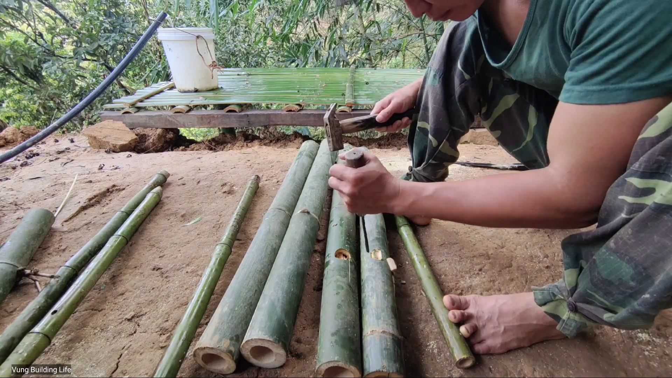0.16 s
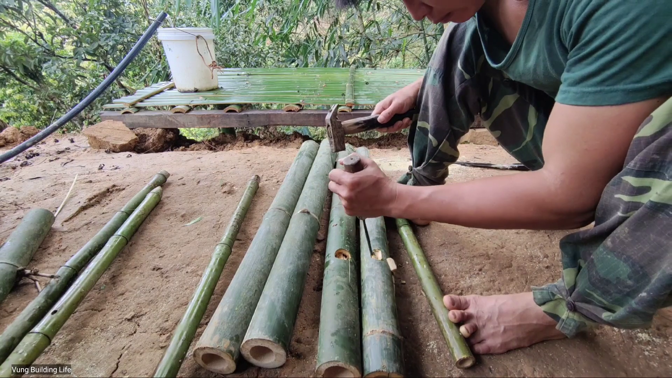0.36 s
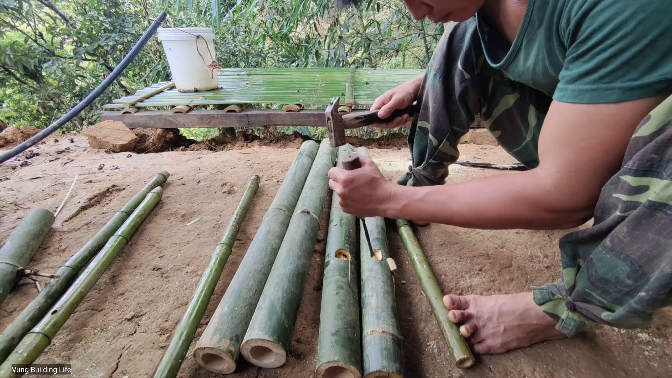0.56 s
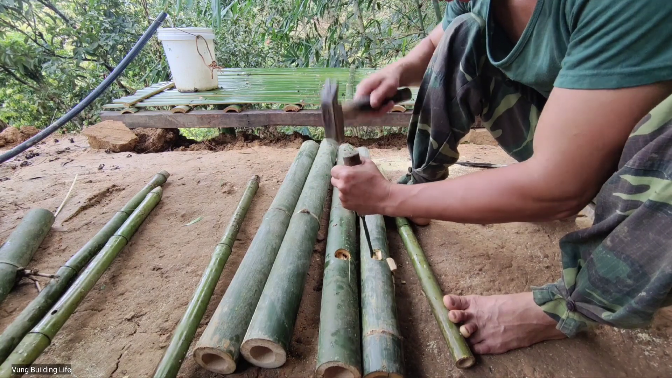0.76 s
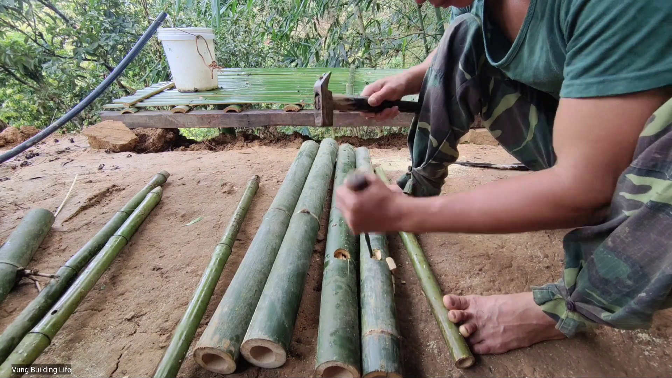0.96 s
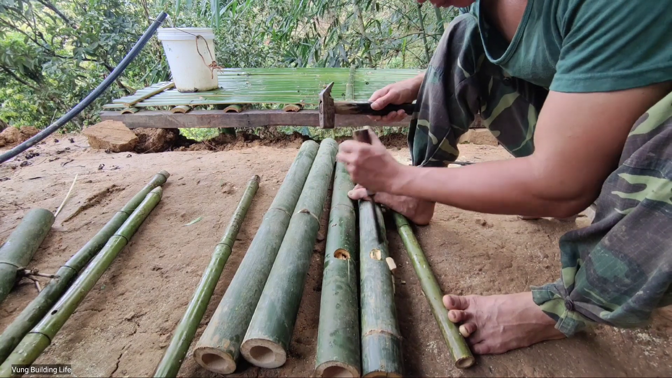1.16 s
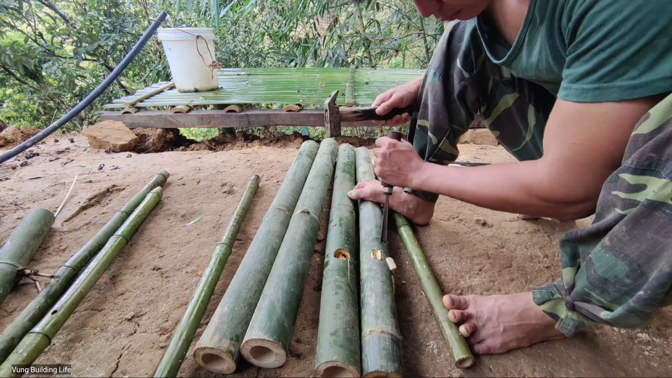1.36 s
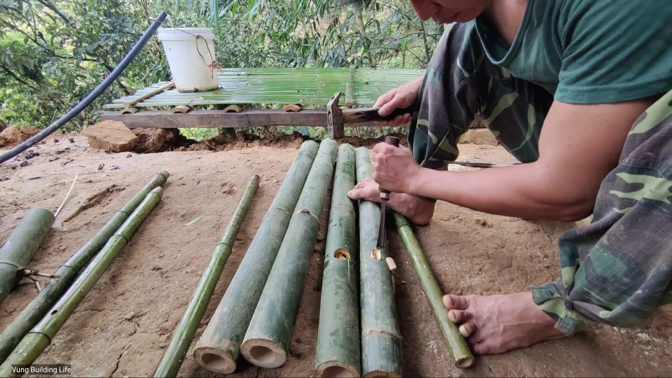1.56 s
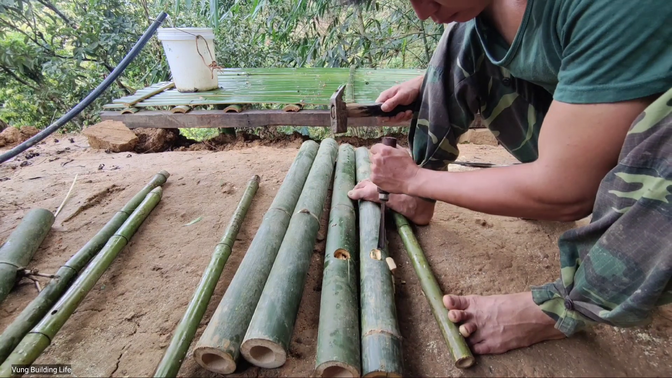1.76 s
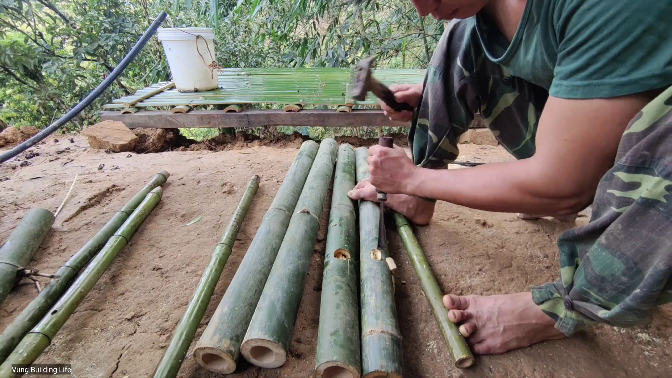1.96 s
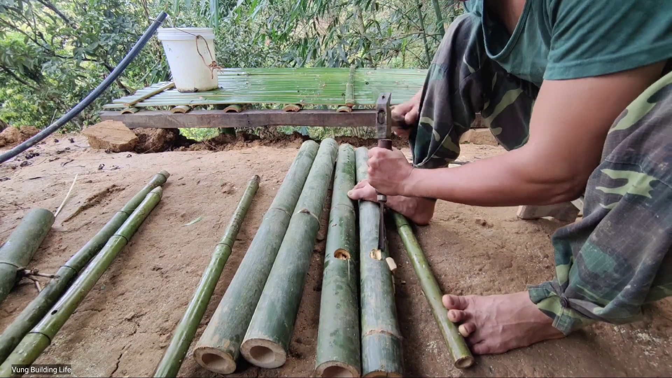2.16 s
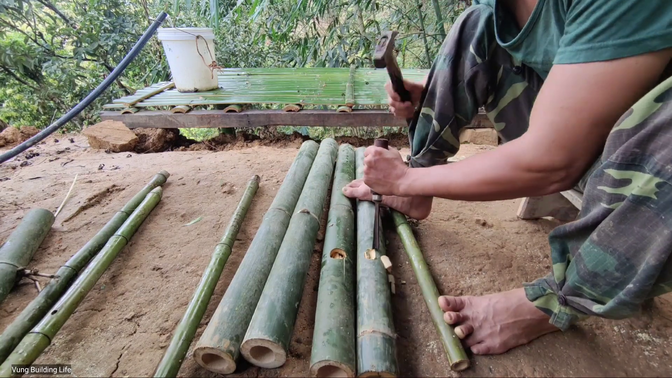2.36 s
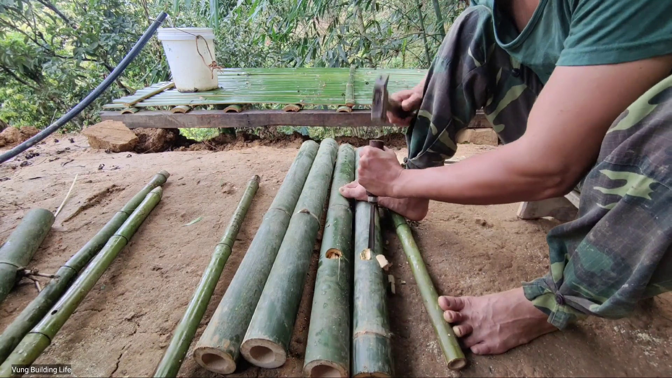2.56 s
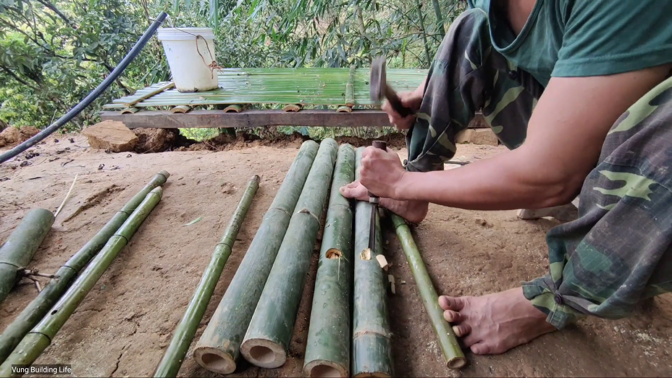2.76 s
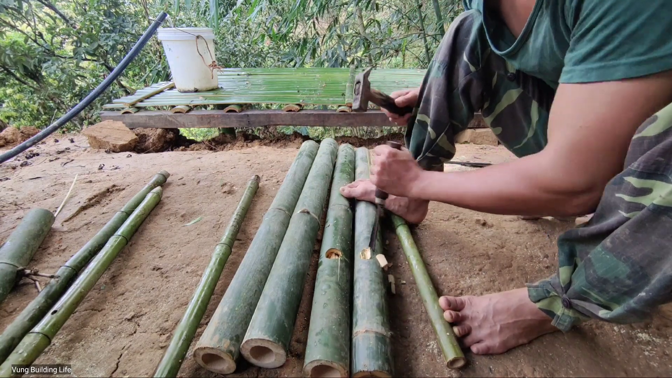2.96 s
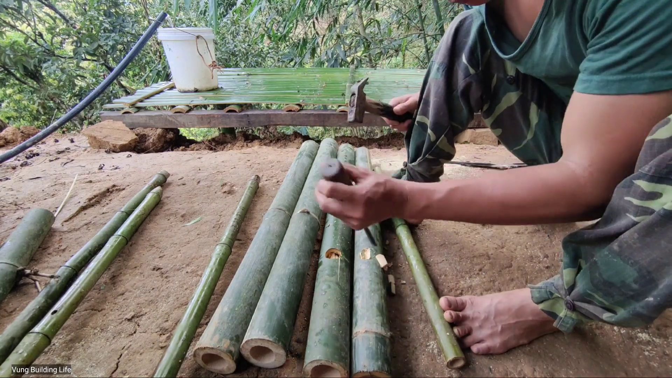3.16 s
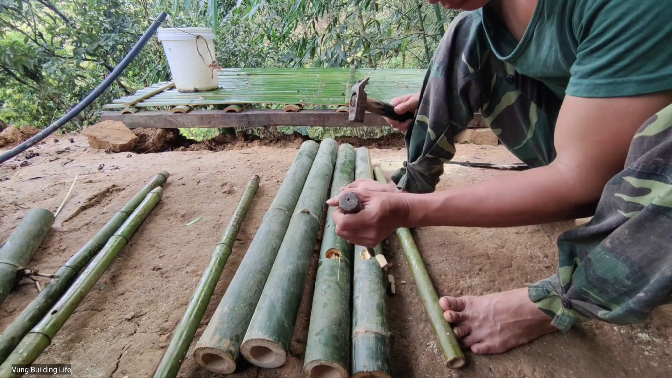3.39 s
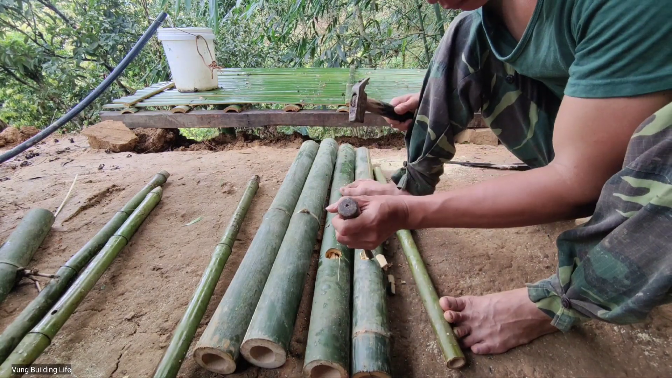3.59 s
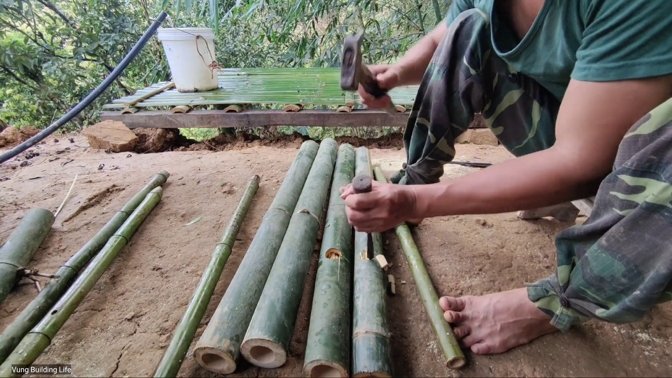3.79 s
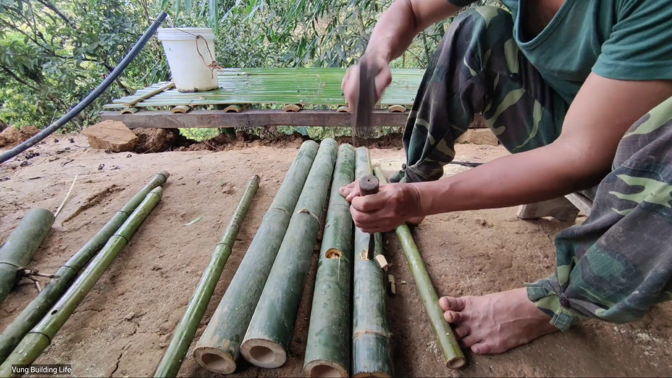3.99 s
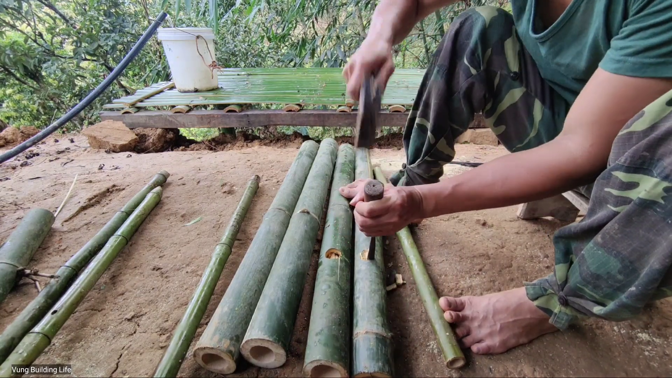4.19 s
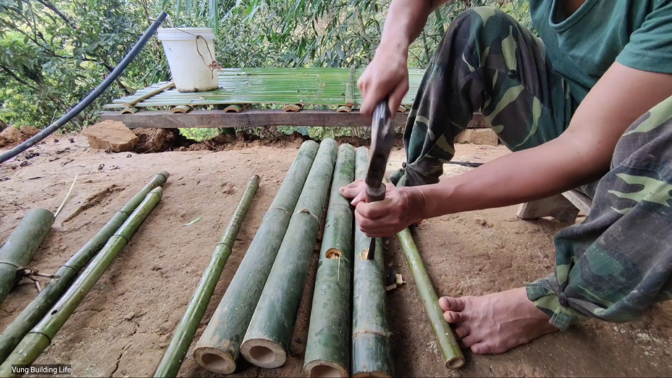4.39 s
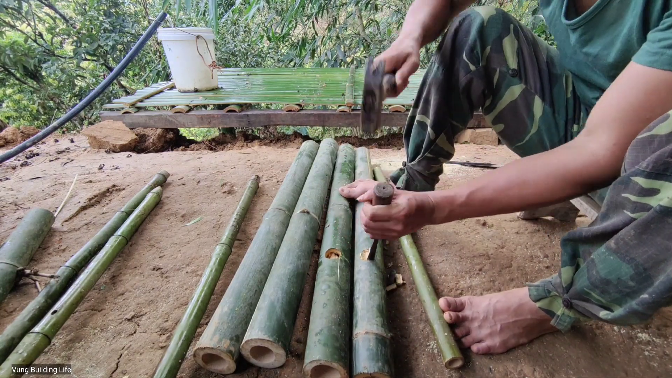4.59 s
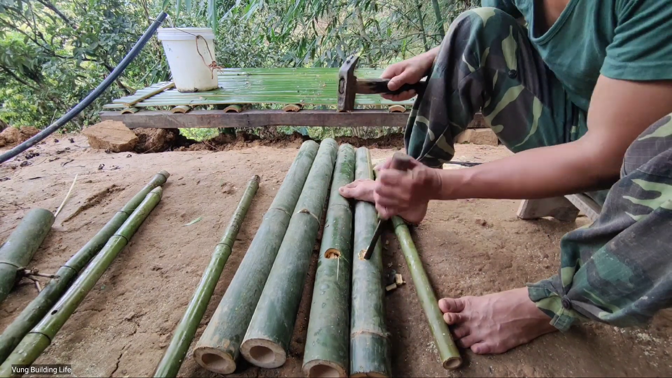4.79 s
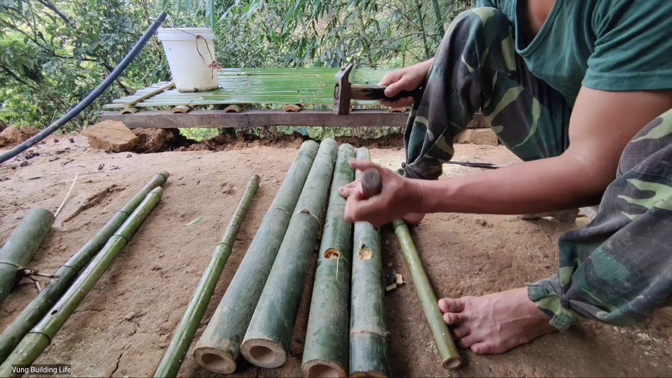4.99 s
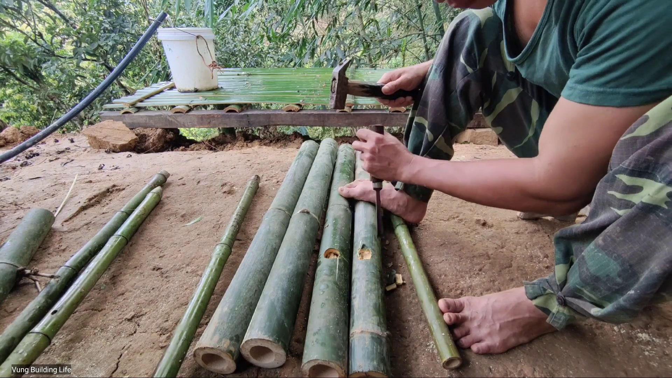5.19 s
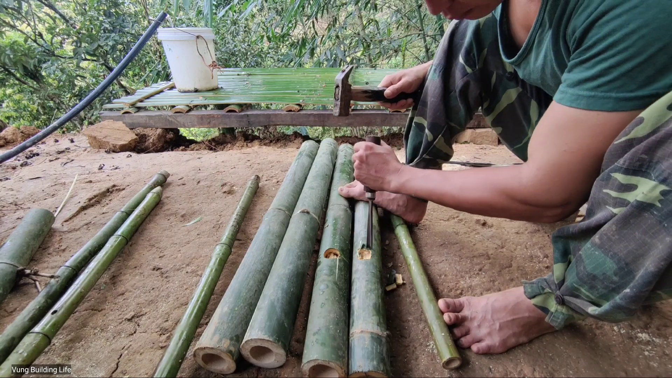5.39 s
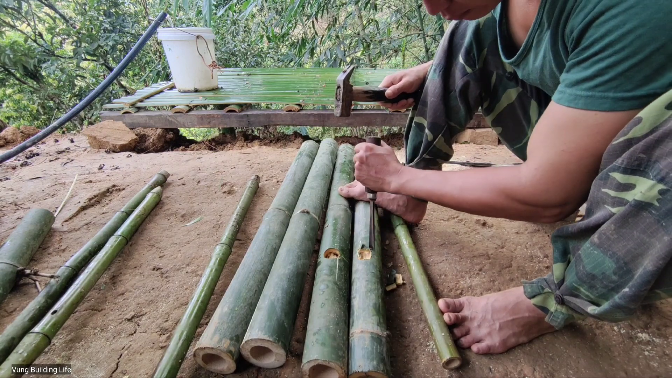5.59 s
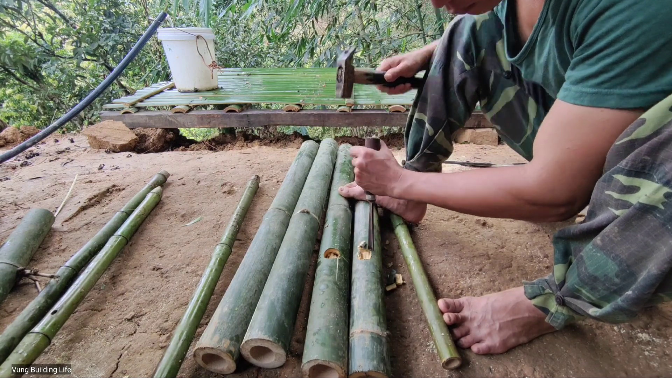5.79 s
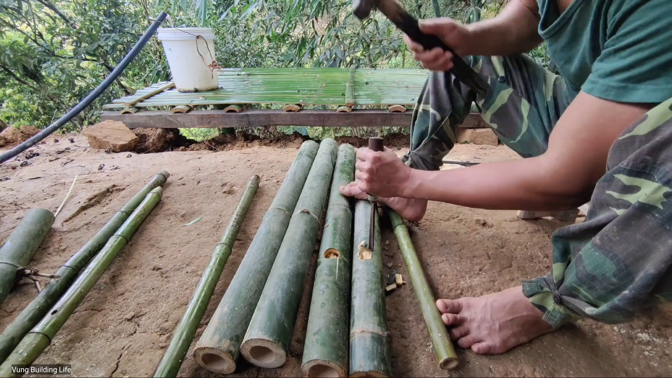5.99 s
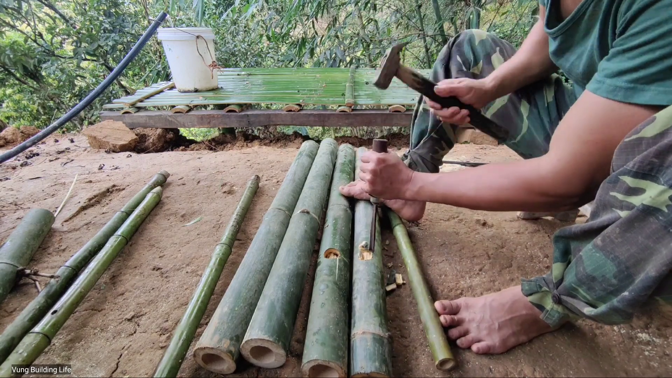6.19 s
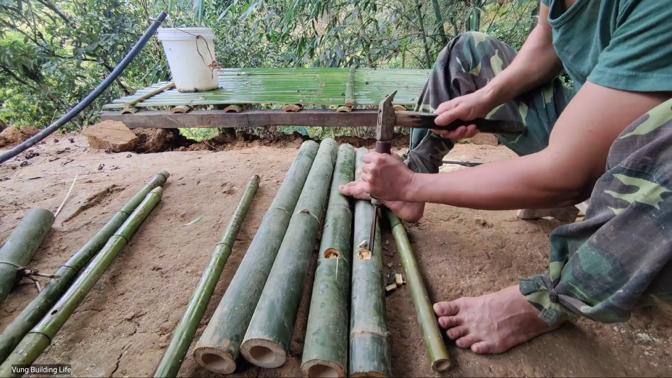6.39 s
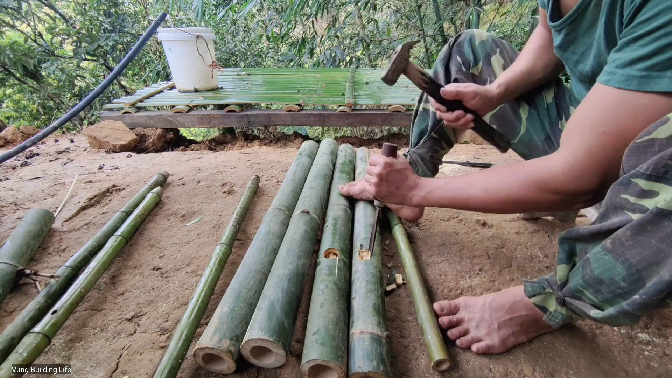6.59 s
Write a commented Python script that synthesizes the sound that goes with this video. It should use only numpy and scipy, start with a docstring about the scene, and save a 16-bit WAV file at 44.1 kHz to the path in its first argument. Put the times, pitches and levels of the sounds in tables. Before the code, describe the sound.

Outdoors, a phone microphone sits a metre or two from the work. A thin, very high cicada hiss, stronger on the right, throbs about eleven times a second throughout over a faint low breeze and leaf rustle. Tiny bird whistles come before 0.9 s. A light chisel rub at 0.6 precedes two bright steel cracks at 0.8 and 0.9; another rub follows at 1.3. From 2.07 to 2.84 seven quick, even blows ring the hollow bamboo briefly, each with a short grainy tail. Small snaps and scraping occur around 3.05, then faint birds near 3.4. Six blows run from 3.94 to 4.59, growing stronger. A crisp chip snap and gritty rub stand out at 4.9. A distant, dull engine fades in after 5.2, with soft rubs around 5.4 to 5.9. Four hard blows from 6.18 to 6.56 end it. The background ducks around the blows.

```python
"""Chiselling green bamboo outdoors

A hammer drives a steel chisel into bamboo poles in quick bursts, a metre or two from a phone's microphone.
Each blow is a resonant steel crack, a ring of the hollow pole and a grainy scatter off trees and ground.
Rubs and snaps are short noise bands; cicadas on the right are throbbing, buzzing noise; birds are faint sines.
Breeze and leaves are coloured noise; a far engine starts up as firing pulses through a dull exhaust.
The phone's bang suppressor ducks everything around each blow, band by band, and then mostly lets go at once.
"""
import sys
import numpy as np
from scipy import signal
from scipy.fft import rfft, irfft
from scipy.io import wavfile
from scipy.ndimage import uniform_filter1d, minimum_filter1d

SR = 44100
rng = np.random.default_rng(int(sys.argv[2]) if len(sys.argv) > 2 else 0)


def file_out(sig):
    """Save sig as 16-bit WAV at sys.argv[1]."""
    # one column per channel
    cols = np.atleast_2d(sig).T
    # limit, then scale
    lim = np.clip(cols, -1, 1)
    pcm = np.round(lim * 32767).astype(np.int16)
    wavfile.write(sys.argv[1], SR, pcm)


N = 293265  # length [samples]

# far engine: (time [s], firing rate [Hz], level [dB])
ENGINE_COURSE = [(4.9, 59.5, -110), (5.2, 59.7, -82), (5.5, 61.2, -73), (5.7, 62.24, -61.5),
                 (5.9, 60.5, -63), (6.15, 61.43, -65), (6.65, 60.8, -59)]
# exhaust resonances, before the response is squared: (centre [Hz], width [Hz], level [dB])
EXHAUST_MODES = [(436, 112, 40), (260, 36, -23), (563, 91, -33.5)]
# colour of breeze and leaves, shape only: (frequency [Hz], level [dB per Hz])
FOREST_COLOUR = [(15, -69), (25, -30), (150, -12.5), (183, -8.5), (272, -6), (308, 5.5), (481, -2.5),
                 (580, -2), (690, -1), (740, -8.5), (2810, -14.5), (3430, -15.5), (3690, -15), (8600, -13),
                 (9500, -8.5), (12400, -32), (20900, -120)]
# breeze, before each band's own offset: (time [s], level [dB])
BREEZE_LEVEL = [(0, -71.5), (.65, -72.5), (1.4, -74.5), (1.93, -73.5), (2.39, -70.5), (3.13, -69.5),
                (3.65, -74.5), (4.41, -69), (5.08, -71), (5.74, -70.5), (6.2, -67), (6.65, -66)]
# the whole cicada song, before panning: (time [s], level [dB])
CICADA_LEVEL = [(0, -51), (.6, -49), (1.2, -50), (2, -50), (2.8, -50), (3.3, -51), (3.7, -49.5),
                (4.3, -49.5), (4.9, -49), (5.9, -49), (6.65, -48)]
# colours of the song's upper, lower and edge bands, shape only: (frequency [Hz], level [dB per Hz])
HIGH_COLOUR = [(10800, -30), (11500, -6), (12300, 0), (12950, -2.5), (13250, -7), (13700, -26),
               (14400, -29.5), (15420, -16), (15600, -66)]
LOW_COLOUR = [(10200, -46), (10500, -7), (11000, -4.5), (11600, -5.5), (12200, -11)]
EDGE_COLOUR = [(9000, -16), (9350, -13.5), (9700, 1.5), (10300, 3.5), (10700, 9.5), (11000, -35)]
# dips of the song's lower edge: throbs about eleven times a second and, just after some blows,
# the suppressor's deeper duck; depths are scaled later, positive ones ignored:
# (time [s], depth [relative dB], depth at the very edge [relative dB])
SONG_DIPS = [(0.092, -9.0, -19), (0.176, -12, -19), (0.249, -7, -8), (0.335, -3, -2), (0.445, 0, -3),
             (0.545, -5, -7), (0.635, -7.0, -8), (0.726, -10.0, -16), (0.81, -14.5, -10),
             (0.936, -11.0, -8.0), (1.02, -4.5, -1), (1.095, -3.0, -3), (1.195, -2, -6), (1.277, -6, -13.0),
             (1.367, -4, -10.0), (1.443, -3.0, -5), (1.574, -4, -10), (1.666, -4, -6), (1.75, -4, -2),
             (1.862, -6.0, -13.0), (1.98, -5, -11.0), (2.161, -9, -15), (2.281, -16, -8), (2.361, -13, -14),
             (2.49, -13, -10), (2.558, -9, -19), (2.672, -9, -6), (2.78, -4, -6), (2.933, -12, -10.0),
             (3.019, -15, -14.0), (3.115, -13, -9), (3.221, -12, -20), (3.334, 0, -2), (3.42, -5, -11),
             (3.506, -4.0, -8), (3.64, -2, -12.0), (3.734, -5, -4), (3.813, -3.5, -9), (3.93, -3, -6.0),
             (4.037, -6, -8), (4.145, -4.0, 2), (4.274, -11.0, -9), (4.406, -11.0, -9), (4.545, -3, -5),
             (4.623, -16, -10.0), (4.66, -8, -8.0), (4.755, -7.0, -14.0), (4.849, -8, -12.0),
             (4.959, -1, -3), (5.045, -5, -7), (5.132, -5, -3), (5.212, -3, -7), (5.342, -1, -8),
             (5.438, -3, -12.0), (5.517, -2, -10.0), (5.661, -3, -7), (5.751, -6, -12.0),
             (5.831, -7.0, -12.0), (5.933, -4, -7.0), (6.074, -5.0, -9.0), (6.154, -4, -8.0),
             (6.246, -6.0, -10.0), (6.334, -9.0, -8.0), (6.461, -9, -5), (6.589, -8, -2)]
# faint bird whistles: (middle [s], half length [s], pitch [Hz], rise [Hz], level [dB])
BIRD_NOTES = [(.138, .018, 2830, -80, -77), (.663, .019, 2480, 50, -63), (.760, .012, 2470, 0, -68),
              (.825, .022, 2460, 30, -61), (.872, .018, 2480, 60, -62), (3.31, .03, 3470, 0, -80),
              (3.395, .025, 3470, 0, -77), (3.485, .03, 3450, -30, -75)]
# chisel rubbing the pole; width before squaring:
# (time [s], level [dB], centre [Hz], width [Hz], 60 dB decay [s])
CHISEL_RUBS = [(0.609, -62.5, 4900, 2500, 0.38), (1.331, -60.5, 7000, 2500, 0.13),
               (3.034, -56, 7500, 6000, 0.14), (3.038, -65, 2720, 900, 0.25), (3.072, -57, 4800, 3000, 0.1),
               (4.754, -64, 3760, 2500, 0.41), (4.886, -48.5, 8400, 4020, 0.24),
               (4.9, -54, 4730, 4000, 0.2), (5.368, -67, 3220, 3030, 0.32), (5.75, -69.5, 2500, 2520, 0.46),
               (5.763, -62.5, 7100, 1950, 0.5), (5.899, -69.5, 3540, 4100, 0.84)]
# a chip tears and snaps off; width before squaring:
# (time [s], level [dB], centre [Hz], width [Hz], 60 dB decay [s], 60 dB growth before the time [s])
CHIP_SNAPS = [(1.0516, -50, 14500, 2000, .03, .002), (2.8904, -50, 14500, 2000, .012, .002),
              (3.0388, -41, 14700, 1800, .006, .001), (3.0355, -56, 8500, 3000, .01, .001),
              (3.0705, -44, 4900, 1500, .025, .04), (3.069, -51, 2700, 700, .015, .04),
              (4.8993, -26.5, 11500, 7000, .009, .0003), (4.8993, -30, 5700, 2000, .009, .0003),
              (4.8995, -39, 4200, 900, .05, .0005), (6.0902, -56, 14500, 2000, .015, .002)]
# hammer blows, before the suppressor: (time [s], crack peak [dB], knock below 2.3 kHz [dB],
#  mode near 2.8 kHz [dB], top above 10 kHz [dB], more above 13 kHz [dB],
#  chisel's loudest ring [Hz], [dB], its next ring [Hz], [dB],
#  pole ring [dB], its lower modes [dB], tail [dB], tail below 3 kHz [dB],
#  band lingering in the tail [Hz], [dB], left minus right of crack and tail [dB])
HAMMER_BLOWS = [(0.7788, -9.5, -2.5, 3, 9, 2, 3700, 12.5, 5560, 6.5, -47, -1, -1.5, 2, 5500, 1, 1.5),
                (0.9027, -6, -2.5, -7, 4, 1, 5380, 9.5, 8500, 2, -41, 8.5, -1, 4.5, 8200, 6, 0.5),
                (2.0675, -9.5, -2, -15, -1, 2, 2400, 2.5, 4100, -3, -50, -5, -6, 4.5, 3600, 7, 3.5),
                (2.2031, -7.5, 2, -3, -0.5, 11, 3820, 8.5, 7300, 3.5, -27.5, 0, -3.5, -0.5, 7300, 9, 3.5),
                (2.3323, -4.5, 5.5, -2.5, -2.5, -4, 7400, 4, 12500, 7, -22.5, -4.5, 2, -2.5, 3330, 0, 1),
                (2.46, -4.5, 1, -5, 4.5, 6, 7240, 5, 12500, 10, -23, -6.5, -3, -4, 7460, 3, 2),
                (2.5857, -2.5, -3, -5.5, 5.5, 4, 6450, 6, 12800, 11, -26.5, -1.5, -1, -4, 5600, -3, 1.5),
                (2.709, -6.5, 4, 1, -4.5, -7, 4650, 6, 7730, 5, -24, 0.5, 0, -2.5, 5170, 2, 2.5),
                (2.8404, -4.5, 2.5, -2, 2.5, 4, 3700, 5.5, 11500, 3, -23.5, 1.5, -2, 0.5, 5800, 2, 2),
                (3.9395, -11.5, -5.5, -1, -4, 0, 3260, 3.5, 11930, 7, -23.5, -10, -3.5, 3.5, 3300, -8, 1.5),
                (4.072, -9, -2, -9, 4, -2, 5880, 15, 7900, 14.5, -48, 14, -3.5, 2.5, 6300, 10, 2),
                (4.205, -4.5, -3, -15, -3, -11, 8050, 10.5, 5800, 8, -24.5, 3.5, -2, 1, 7700, -5, 0),
                (4.3357, -4, -4, 0.5, 2.5, 2, 5690, 8, 6700, 5, -20.5, 1, -2, 0, 6060, 8, 4),
                (4.4650, -2.5, -9, -0.5, 5, -4, 4570, 6, 8960, 4, -20, -3, -0.5, -2, 4670, -7, -1),
                (4.5938, -5, -10, 7, 0.5, 5, 4620, 13.5, 6530, 1.5, -16.5, -3, -1.5, -0.5, 2550, 5, 1.5),
                (6.1774, -8, 3, 4, 1, -1, 4340, 5.5, 10660, 5.5, -57, 5, -1, -5, 7560, 9, -3),
                (6.307, -4, -9, 0, 3.5, -6, 3980, 5.5, 7440, 4, -47, -8, 0, -9.5, 2707, 1, 1.5),
                (6.4339, -2, 0.5, -1, 8, 0, 6100, 10, 11200, 6, -34, 0, 1, -10, 5600, 7, 1.5),
                (6.562, -5.5, -0.5, -2, 2.5, -0.5, 7460, 6.5, 5380, 6, -29.5, -5, -1, -8, 5430, 6, 0.5)]
# crack resonances, varied at each blow: (centre [Hz], width [Hz], level [dB])
CRACK_MODES = [(1030, 500, -21.5), (1960, 644, 1), (2760, 216, 6), (3760, 780, -4.5), (4595, 590, -0.5),
               (5270, 420, -3.5), (5980, 680, 0.5), (7530, 480, 1), (8800, 920, -5), (10410, 770, -0.5),
               (11470, 630, 2.5), (12380, 740, 4), (13250, 500, -4), (15300, 490, -6)]
# hollow pole's modes, varied at each blow: (pitch [Hz], level [dB], 60 dB decay [s], build-up [s])
POLE_MODES = [(239, -21, 0.092, 0.023), (364.4, -21.5, .18, 0.036), (537, -12, 0.22, 0.083),
              (600, -9.5, 0.21, 0.064), (669, -0.8, 0.16, 0.041), (719, -15, 0.12, 0.027),
              (895, -21, 0.078, .02)]
# scattered tail over the crack's own colour: (frequency [Hz], gain [dB])
SCATTER_COLOUR = [(500, -5), (900, 7), (1500, 4), (3000, 6), (5000, 5.5), (8000, 6.5), (10000, 5.5),
                  (13000, -3.5), (15500, 8), (16500, -60)]
# suppressor bands: (upper edge [Hz], share of the duck, part that sets in late, part that recovers slowly)
SUPPRESSOR_BANDS = [(905, 1.02, 0.84, 0.01), (8900, 0.87, 0.79, 0.066), (12000, 1.2, 0.88, 0.56),
                    (20200, 1.15, 0.76, 0.32)]

DIP_S, EDGE_DIP_S = 0.019, 0.019  # half length of a dip in the song, and at its edge
EDGE_WAVER_DB = 1.5
RUB_RISE_S, RUB_PAN_DB = 0.0021, -1
CLICK, RING_WIDTH_HZ = 3.27, 335  # first contact against the splintering after it; chisel rings' width
LOOSE_DB, LOOSE_HZ = -9, 45  # noisy part of the pole's 669 Hz mode; its width before squaring
THUMP_HZ, THUMP_DB, THUMP_T60_S = 444, 2, 0.0092  # the pole's wall gives first; dB over the ring
SCATTER_DB, SMEAR = -23, 2.6  # the many paths widen each resonance this many times
PATCHY_DB, FINE_DB = 3, 2  # spread of the tail's colour from band to band, and from line to line
THRESHOLD_DB = -18.5
AHEAD_S, RAMP_S, HOLD_S = .003, .003, .039
LATE_S, SLOW_S = 0.009, .04  # time constants of late onset and slow recovery
# a lone bang is ducked lightly, one in a run harder; bites are dB of duck per dB over the threshold
BITE, WARM_BITE, FULL_BITE, MEMORY_S = 0.024, 9.7, 1.345, 0.54  # first, added, most, memory
RUMBLE_HZ, TOP_HZ = 76.4, 16600  # the phone's bass cut and upper limit


def undb(db):
    """Decibels to amplitude."""
    return 10 ** (np.asarray(db) / 20)


def level(x, db):
    """Scale to an rms level in dB."""
    return x * undb(db) / np.sqrt(np.mean(x ** 2))


def pan(db):
    """Channel gains for left minus right in dB."""
    return undb(np.array([[db], [-db]]) / 2)


def curve(table, column=1):
    """A table column drawn as straight lines over time."""
    return np.interp(np.arange(N) / SR, np.array(table)[:, 0], np.array(table)[:, column])


def hertz(size):
    """Frequencies of the spectrum's lines, kept above zero."""
    return np.maximum(np.fft.rfftfreq(size, 1 / SR), 1)


def gains(points, size):
    """Gain at each frequency for (Hz, dB) points, silent outside."""
    hz, db = np.transpose(points)
    return undb(np.interp(np.log(hertz(size)), np.log(hz), db, -200, -200))


def peaks(rows, size):
    """Summed response of (Hz, width, dB) resonances."""
    f = hertz(size)
    return sum(undb(db) / (1 + 1j * (f - hz * hz / f) / width) for hz, width, db in rows)


def noise(gain, alike, size):
    """Two channels of coloured noise of rms 1; alike = 1 makes them equal."""
    mid, side = rfft(rng.standard_normal((2, size)))
    alike = np.clip(alike, 0, 1)
    both = np.sqrt(1 + alike) * mid + np.sqrt(1 - alike) * side * np.array([[1], [-1]])
    return level(irfft(both * gain, size), 0)


def steps(size, length):
    """Random values, each held for a number of samples."""
    return np.repeat(rng.standard_normal(size // length), length)


def walk(rate):
    """Random levels held 1 / rate s and slewed twice; spread near 1."""
    k = int(SR / rate)
    held = np.repeat(rng.standard_normal(N // k + 1), k)
    return 1.45 * uniform_filter1d(uniform_filter1d(held, k), k)[:N]


def add(out, sound, s):
    """Mix a sound in at s seconds."""
    i = int(s * SR)
    out[:, i:i + sound.shape[1]] += sound[:, :N - i]


def fade(t, rise, t60):
    """Exponential build-up, then a decay of 60 dB in t60 s."""
    return (1 - np.exp(-t / rise)) * undb(-60 * t / t60)


def lag(x, s):
    """Follow a signal with a time constant of s seconds."""
    keep = np.exp(-1 / (s * SR))
    return signal.lfilter([1 - keep], [1, -keep], x)


def engine():
    """Uneven firings ring a dull exhaust far away; the air makes it waver."""
    rate = curve(ENGINE_COURSE) * (1 + 0.009 * walk(30))
    turns = np.floor(np.cumsum(rate) / SR).astype(int)
    strength = undb(2.0 * rng.standard_normal(N // 100))
    pulses = np.diff(turns, prepend=0) * strength[turns]
    exhaust = irfft(rfft(pulses) * peaks(EXHAUST_MODES, N) ** 2, N)
    return level(exhaust, 0) * undb(curve(ENGINE_COURSE, column=2) + 1.2 * walk(12))


def forest():
    """A low breeze swells in patches, alike on both sides; a thin rustle of leaves flickers band by band."""
    f, gain, leaves = hertz(N), gains(FOREST_COLOUR, N), 0
    for lo in 900 * 2 ** (np.arange(12) / 3):  # third-octaves
        part = gain * (f > lo) * (f <= lo * 2 ** (1 / 3))
        flicker = undb(3.2 * walk(22.006) + 0.93 * walk(3.35))
        leaves = leaves + noise(part, 0.018, N) * np.sqrt(np.mean(part ** 2)) * flicker
    out = level(leaves, -68.5)
    # breeze bands: lower edge [Hz], upper edge [Hz], offset [dB]
    for lo, hi, db in [(19.6, 65, -21.0), (70, 140, -13.5), (144.7, 280, -4.0),
                       (266.3, 480, -1.0), (475.0, 730, -5.5), (735, 900, -14)]:
        swell = undb(curve(BREEZE_LEVEL) + db + 1.97 * walk(11) + 1.73 * walk(4.02))
        out = out + noise(gain * (f > lo) * (f <= hi), 0.85, N) * swell
    return out


def cicadas():
    """Dense buzzing noise to the right; its lower edge dips in throbs and, after some blows, as ducked."""
    coarse_t = np.arange(0, N, 32) / SR
    when, depth_db, edge_db = np.transpose(SONG_DIPS)

    def dip(db, half):
        """Bell-shaped dips in dB at the listed times."""
        bells = np.exp(-((coarse_t - when[:, None]) / half) ** 2)
        return np.repeat(np.minimum(db, 0) @ bells, 32)[:N]

    pulsing = np.sin(2 * np.pi * 130 * np.arange(N) / SR + 3 * walk(4.3))
    buzz = undb(0.81 * walk(260) + 0.8 * pulsing)
    high = noise(gains(HIGH_COLOUR, N), 0.019, N) * undb(0.5 * walk(25))
    colour, low = gains(LOW_COLOUR, N), 0
    lower = 1 / (1 + (hertz(N) / 11150) ** 40)
    # the half below 11.15 kHz dips deeper and longer than the half above
    for part, share, half in [(lower, 1.9, DIP_S), (1 - lower, 1.1, 0.77 * DIP_S)]:
        weight = np.sqrt(np.mean((colour * part) ** 2) / np.mean(colour ** 2))
        dipping = undb(dip(share * depth_db, half) + 0.5 + 0.89 * walk(26))
        low = low + noise(colour * part, 0.018, N) * weight * dipping
    edge_level = dip(2.0 * edge_db, EDGE_DIP_S) - 10 + EDGE_WAVER_DB * walk(11)
    edge = noise(gains(EDGE_COLOUR, N), 0.023, N) * undb(edge_level)
    return pan(-9.0) * undb(curve(CICADA_LEVEL)) * buzz * (high + low + edge)


def birds():
    """Short gliding sine notes, blurred by many paths through the trees."""
    t, out = np.arange(N) / SR, 0
    paths = 0.8 + 0.4 * (walk(200) + 1j * walk(200))
    for s, half, hz, rise_hz, db in BIRD_NOTES:
        u = np.clip((t - s) / half, -3, 3)
        phase = 2j * np.pi * np.cumsum(hz + rise_hz * u / 2) / SR
        out = out + undb(db) * np.exp(-u ** 2) * np.exp(phase)
    return np.real(out * paths)


def scrapes(size=16384):
    """Short gritty rubs and snaps while the chisel is moved and levered."""
    out, t = np.zeros((2, N)), np.arange(size) / SR

    def band(db, hz, width):
        """Noise through one squared resonance."""
        return undb(db) * noise(peaks([(hz, width, 0)], size) ** 2, 0.11, size)

    for s, db, hz, width, t60 in CHISEL_RUBS:
        grit = undb(4 * steps(size, 64))
        add(out, pan(RUB_PAN_DB) * band(db, hz, width) * grit * fade(t, RUB_RISE_S, t60), s)
    for s, db, hz, width, t60, grow in CHIP_SNAPS:
        swell = undb(np.minimum(60 * (t / grow - 1), 60 * (grow - t) / t60))
        add(out, band(db, hz, width) * swell, s - grow)
    return out


def steel_crack(colour, t):
    """A contact click and splintering noise excite the steel's resonances; peak 1."""
    size = len(t)
    splinter = fade(t, .0001, .006) + undb(-28) * fade(t, .001, .045)
    burst = noise(1, 1.0 - hertz(size) / 18000, size) * splinter
    burst[:, 1] += CLICK  # one sample, in both channels
    spectrum = rfft(burst)
    white = spectrum / uniform_filter1d(np.abs(spectrum), size=300)  # even in every band
    crack = irfft(white * colour, size) * (t < .2)
    return crack / np.abs(crack).max()


def pole_ring(lower_db, t):
    """Decaying modes of the hollow pole; the air inside takes a moment to build up."""
    ring, size = 0, len(t)
    for hz, db, t60, rise in POLE_MODES:
        gain = undb(db + lower_db * (500 < hz < 640) + 1.7 * rng.standard_normal())
        phase = 2 * np.pi * rng.random() + .5 * rng.standard_normal((2, 1))
        tone = np.sin(2 * np.pi * hz * t + phase)
        loose = noise(peaks([(hz, LOOSE_HZ, 0)], size) ** 2, 1.0, size) / 2
        loose = loose * undb(LOOSE_DB * (640 < hz < 700))  # 0 dB for the other modes
        ring = ring + gain * (tone + loose) * fade(t, rise, t60)
    return ring * (1 - np.exp(-t / 0.0016))


def scattered_tail(linger, t):
    """Trees and ground return a short grainy tail, patchy in colour."""
    size = len(t)
    lines = size // 2 + 1
    grit = undb(2.5 * steps(size, 128))
    patches_db = PATCHY_DB * steps(65 * 128, 128)[:lines] + FINE_DB * steps(513 * 16, 16)[:lines]
    colour = linger * undb(patches_db) * gains(SCATTER_COLOUR, size)
    return noise(colour, 0.097, size) * grit * fade(t, 0.00027, 0.14)


def hammer(size=16384):
    """Steel on steel cracks, the pole's wall thumps, the hollow pole rings on and a tail scatters."""
    out, t, f = np.zeros((2, N)), np.arange(size) / SR, hertz(size)
    for (s, db, knock_db, mode_db, top_db, air_db, chisel_hz, chisel_db, next_hz, next_db,
         ring_db, lower_db, tail_db, dull_db, band_hz, band_db, pan_db) in HAMMER_BLOWS:
        # every blow lands a little differently and stirs the resonances anew
        modes = []
        for hz, width, mode_level in CRACK_MODES:
            mode_level += knock_db * (hz < 2300) + mode_db * (2300 < hz < 3300)
            mode_level += top_db * (hz > 10000) + air_db * (hz > 13000)
            modes.append((hz, width, mode_level + 1.93 * rng.standard_normal()))
        edges = 1 / (1 - 1j * 500 / f) ** 2 / (1 + (f / 16000) ** 12)
        # the pole's knock reaches the left side best, the steel's top the right
        tilt = undb(np.array([[-1], [1]]) * 0.65 * np.log2(f / 5000))
        edges = edges * pan(pan_db) * tilt
        chisel = [(chisel_hz, RING_WIDTH_HZ, chisel_db), (next_hz, RING_WIDTH_HZ, next_db)]
        crack = steel_crack(peaks(modes + chisel, size) * edges, t)
        smeared = [(hz, SMEAR * width, d) for hz, width, d in modes]
        linger = peaks(smeared + [(band_hz, 700, band_db)], size) * edges
        linger = linger * undb(dull_db / (1 + (f / 3100) ** 8))
        tail = undb(SCATTER_DB + tail_db) * scattered_tail(linger, t)
        ring = undb(ring_db) * pole_ring(lower_db, t)
        thump = np.sin(2 * np.pi * THUMP_HZ * t) * fade(t, 0.0022, THUMP_T60_S)
        thump = undb(ring_db + THUMP_DB) * thump
        add(out, undb(db) * (crack + tail + ring + thump), s)
    return out


def scene():
    """Everything that reaches the phone, from the far engine to the near hammer."""
    return engine() + forest() + cicadas() + birds() + scrapes() + hammer()


def record(dry):
    """A bang suppressor looks ahead, deepens its duck, holds it, then lets go; each band by its own share."""
    over_db = np.minimum(THRESHOLD_DB - 20 * np.log10(np.abs(dry).max(axis=0) + 1e-9), 0)
    ahead, hold = int(AHEAD_S * SR), int(HOLD_S * SR)
    held = np.roll(minimum_filter1d(over_db, ahead + hold), (hold - ahead) // 2)
    busy = lag(1. * (held < 0), MEMORY_S)  # share of recent time spent ducking
    bite = np.minimum(BITE + WARM_BITE * busy, FULL_BITE)
    quick = uniform_filter1d(held * bite, int(RAMP_S * SR))
    late = np.maximum(lag(quick, LATE_S) - quick, 0)
    slow = np.minimum(lag(quick, SLOW_S) - quick, 0)
    f, spectrum, out, below = hertz(N), rfft(dry), 0, 0
    for hz, share, late_part, slow_part in SUPPRESSOR_BANDS:
        under = 1 / (1 + (f / hz) ** 8)
        duck_db = share * (quick + late_part * late + slow_part * slow)
        out = out + irfft(spectrum * (under - below), N) * undb(duck_db)
        below = under
    bass_cut = signal.butter(2, RUMBLE_HZ, "high", fs=SR, output="sos")
    top_cut = signal.ellip(10, .2, 80, TOP_HZ, fs=SR, output="sos")
    return signal.sosfilt(top_cut, signal.sosfilt(bass_cut, out))


dry = scene()
out = record(dry)
file_out(out)
```